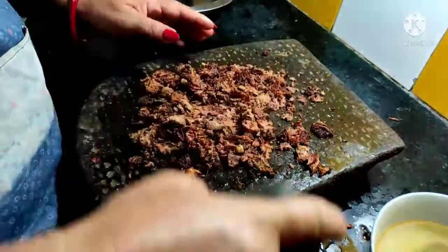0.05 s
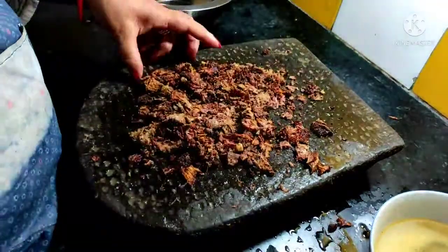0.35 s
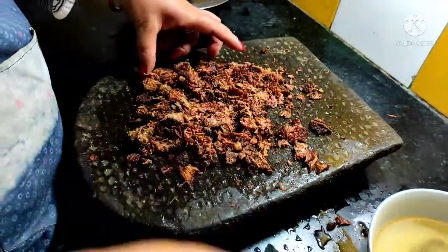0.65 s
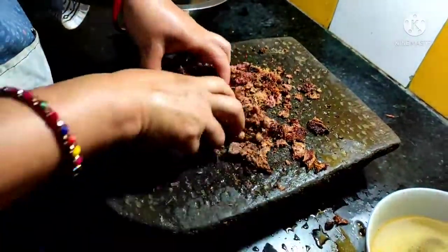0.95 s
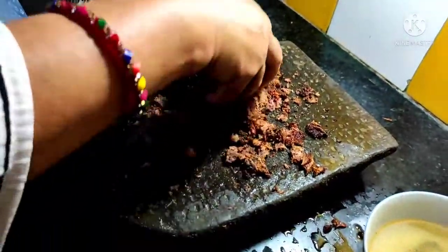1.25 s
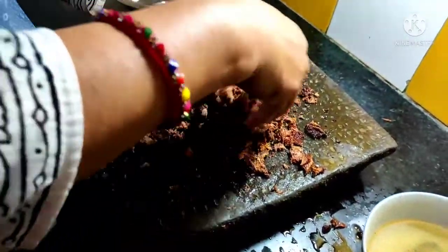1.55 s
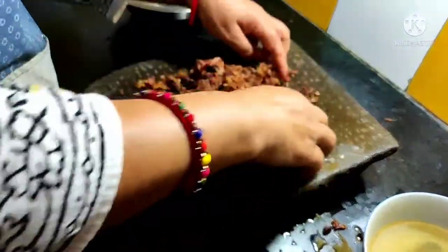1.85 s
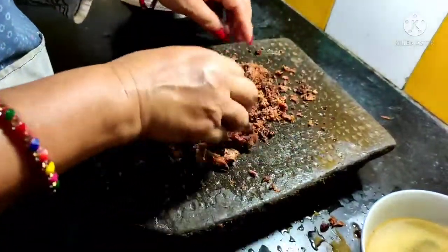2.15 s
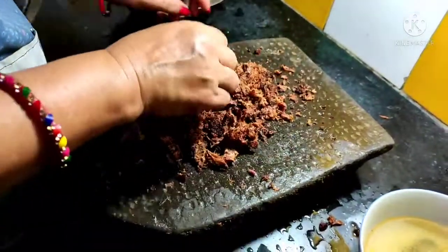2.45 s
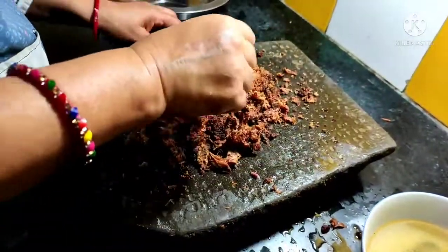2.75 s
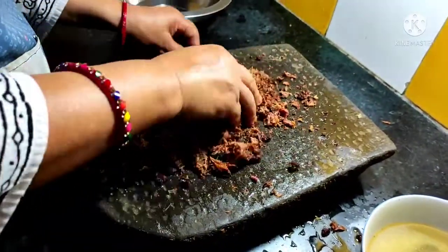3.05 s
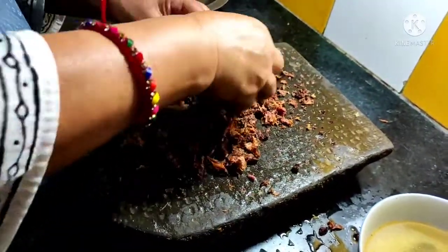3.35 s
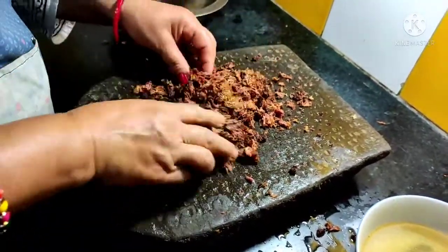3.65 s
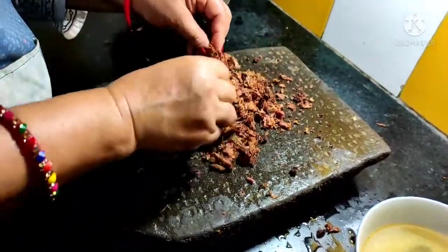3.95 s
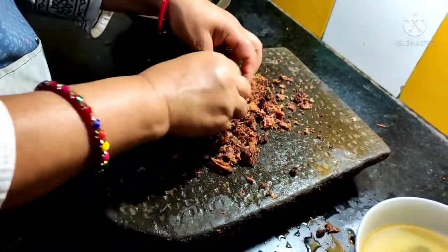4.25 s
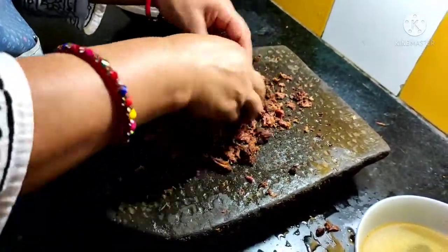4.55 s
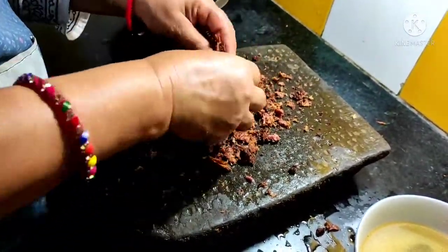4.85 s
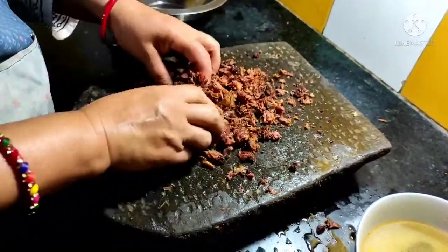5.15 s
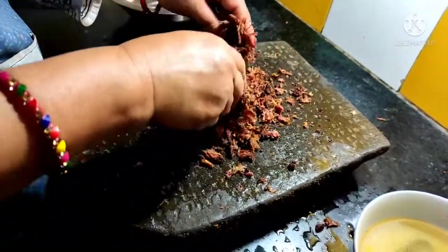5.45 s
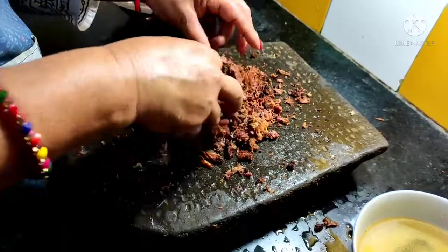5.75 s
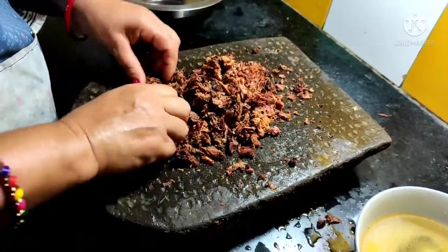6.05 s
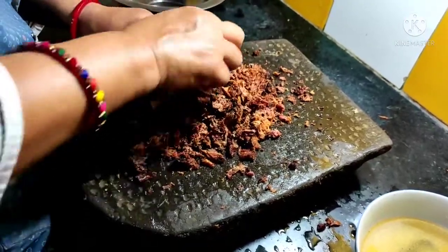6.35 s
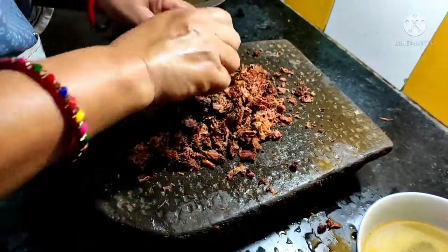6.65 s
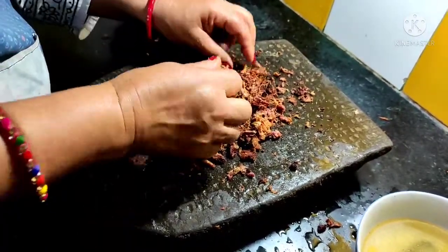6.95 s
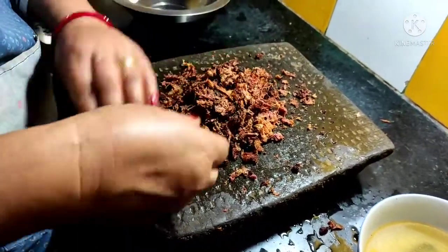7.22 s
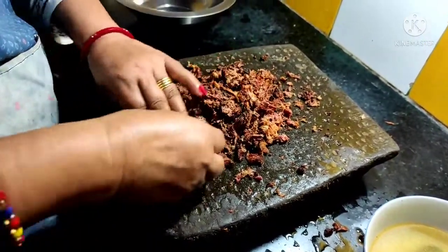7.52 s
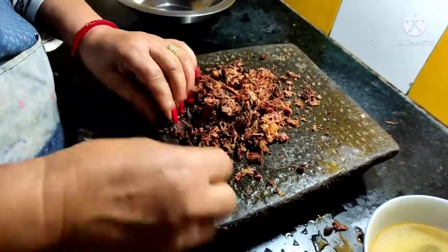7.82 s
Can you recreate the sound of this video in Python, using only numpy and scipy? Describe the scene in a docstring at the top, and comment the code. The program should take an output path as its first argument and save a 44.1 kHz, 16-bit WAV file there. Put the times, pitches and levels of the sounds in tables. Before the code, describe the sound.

In a tiled kitchen an appliance motor hums low and steady. A stone pounder is set down on a stone slab with a dull knock and then a loud, ringing clack, the counter booming underneath. Hands then gather dried shredded meat with quiet, crisp rustles and occasional tiny snaps. The stone grates briefly, and near the end a sleeve catches and swishes past. Everything sounds close, with a short room echo.

```python
"""A tiled kitchen: an appliance motor hums over room rumble; a lower tone beats against it for about 2 s.
A stone pounder is set down on a stone slab: a dull knock at 0.45 s, then a hard, ringing clack at 0.66 s;
the counter booms under it. From 0.9 s hands gather dried, shredded meat, which rustles and snaps.
At 4.7 s the pounder grates over the slab; at 6.3 s a sleeve catches and swishes past."""
import sys
import numpy as np
from scipy import signal
from scipy.fft import rfft, irfft, next_fast_len
from scipy.io import wavfile
from scipy.ndimage import uniform_filter1d

SR = 44100
rng = np.random.default_rng(int(sys.argv[2]) if len(sys.argv) > 2 else 0)


def materialize(psi):
    """Save the field psi as 16-bit PCM at rate SR to the path in sys.argv[1].

    A 1-D psi becomes a single channel; in a 2-D psi each row is a channel.
    """
    bounded = np.clip(np.atleast_2d(psi).T, -1, 1)
    quanta = np.round(bounded * 32767).astype(np.int16)
    wavfile.write(sys.argv[1], SR, quanta)


N = 347508
TIME = np.arange(N) / SR
# spectrum of a breaking fibre: (frequency [Hz], level [dB])
FIBRE_SPECTRUM = [(1000, -20.5), (2200, -12), (3600, -18), (6000, 0.5), (8400, 11.5), (10000, -9.5),
                  (12000, -9), (15000, -11)]


def undb(db):
    """Decibels to gain."""
    return 10 ** (np.asarray(db) / 20)


def unit(x):
    """Scale to rms 1."""
    return x / np.sqrt(np.mean(x ** 2))


def pan(db):
    """Stereo gains for a left-minus-right level."""
    return undb(np.array([[db], [-db]]) / 2)


def fade(t, t60_s):
    """Exponential decay."""
    return np.exp(-np.log(1000) * t / t60_s)


def swell(start_s, rise_s, t60_s):
    """Linear rise, exponential release."""
    t = TIME - start_s
    return np.clip(t / rise_s, 0, 1) * fade(np.maximum(t - rise_s, 0), t60_s)


def walk(rate_hz):
    """Smooth random drift, rms 1."""
    hold = int(SR / rate_hz)
    steps = np.repeat(rng.standard_normal(N // hold + 1), hold)[:N]
    return unit(uniform_filter1d(uniform_filter1d(steps, hold), hold))


def grains(rate_hz, spread_db):
    """Stereo stream of random clicks of uneven size, rms 1."""
    sizes = undb(spread_db * np.minimum(rng.exponential(size=(2, N)), 5))
    hits = rng.random((2, N)) < rate_hz / SR
    return unit(hits * sizes * rng.standard_normal((2, N)))


def cut(x, hz, order, kind="low"):
    """Low- or high-pass."""
    return signal.sosfilt(signal.butter(order, hz, kind, fs=SR, output="sos"), x)


def colour(x, spectrum):
    """Minimum-phase filter from (Hz, dB) points; attacks stay sharp."""
    size = next_fast_len(x.shape[-1] + 4096, real=True) * 2
    hz, db = np.transpose(spectrum)
    bins_hz = np.maximum(np.fft.rfftfreq(size, 1 / SR), 1)
    gain = undb(np.interp(np.log(bins_hz), np.log(hz), db))
    cepstrum = irfft(np.log(gain))
    cepstrum[1:size // 2] *= 2
    cepstrum[size // 2 + 1:] = 0
    return irfft(rfft(x, size) * np.exp(rfft(cepstrum)))[..., :x.shape[-1]]


def ring(modes, t):
    """Damped sines started by one blow."""
    return sum(undb(db) * fade(t, t60_s) * np.sin(2 * np.pi * hz * t) for hz, db, t60_s in modes)


def excite(modes, clicks):
    """Modes rung by a click stream."""
    return signal.fftconvolve(clicks, ring(modes, TIME[:SR // 10])[None], axes=1)[:, :N]


def add(out, start_s, sound):
    """Mix a sound in at a time."""
    i = int(start_s * SR)
    out[:, i:i + sound.shape[-1]] += sound[..., :N - i]


def kitchen(x, wet_db, build_s, shared_hz=550):
    """Direct sound plus a diffuse room tail, alike at both ears in the bass; the very top is cut short."""
    # tail decay; the room up to 8 kHz, cut short above: (frequency [Hz], t60 [s])
    decay = [(100, 0.93), (450, 0.48), (900, 0.38), (2000, 0.38), (3000, .31), (4000, 0.33), (8000, 0.34),
             (11000, 0.17), (15000, 0.073)]
    t = TIME[:SR // 2]
    bins_hz = np.maximum(np.fft.rfftfreq(len(t), 1 / SR), 1)
    noise = np.exp(2j * np.pi * rng.random((3, len(bins_hz))))
    shared = 1 / (1 + (bins_hz / shared_hz) ** 2) ** 2
    noise = np.sqrt(shared) * noise[0] + np.sqrt(1 - shared) * noise[1:]
    hz, t60s = np.transpose(decay)
    bands = [np.interp(np.log(bins_hz), np.log(hz), row) for row in np.eye(len(hz))]
    tail = sum(irfft(noise * band, len(t)) * fade(t, t60_s) for band, t60_s in zip(bands, t60s))
    tail *= 1 - np.exp(-(t / build_s) ** 2)
    tail = unit(tail) / np.sqrt(len(t))
    return x + undb(wet_db) * signal.fftconvolve(x, tail, axes=1)[:, :N]


def motor(hum_hz=206.6, flutter_db=0.79, overtone_db=3, right_lag_s=0.00041, octave_db=-26):
    """Nearly pure hum with faint, unsteady overtones; a lower tone beats against it and dies away."""
    # hum envelope: (time [s], level [dB])
    levels = [(0, -42.5), (.8, -43.5), (2.3, -40.5), (6.8, -41), (7.88, -42)]
    # lower tone: (start [s], rise [s], t60 [s], offset below hum [Hz], level re hum [dB])
    beats = [(0, 1.16, .35, 9.3, -1), (1.394, .12, 1.9, 5.2, -1)]
    # hum harmonics: (multiple, relative level [dB])
    overtones = [(2, -37.5), (3, -38.5), (4, -35), (5, -39), (6, -38.5)]
    ear_time = TIME - np.array([[0], [right_lag_s]])
    phase = 2 * np.pi * hum_hz * ear_time + 0.03 * walk(11)
    tone = np.sin(phase) * undb(flutter_db * walk(40))
    for start_s, rise_s, t60_s, below_hz, db in beats:
        lower_phase = phase - 2 * np.pi * below_hz * (TIME - start_s)
        octave = undb(octave_db) * np.sin(2 * lower_phase + walk(65))
        tone += undb(db) * swell(start_s, rise_s, t60_s) * (np.sin(lower_phase) + octave)
    out = tone * pan(8.92)
    for multiple, db in overtones:
        overtone = [undb(2.5 * walk(35)) * np.sin(multiple * ear + 0.9 * walk(25)) for ear in phase]
        out += undb(db + overtone_db) * np.array(overtone)
    level_db = np.interp(TIME, *np.transpose(levels))
    return np.sqrt(2) * out * undb(level_db)


def air(level_db=-60, crossover_hz=550, drift_db=0.8):
    """Room rumble: alike at both ears in the bass, unrelated in the treble."""
    # room noise: (frequency [Hz], level [dB])
    spectrum = [(25, -6.5), (50, 1.5), (90, -2.5), (130, -13), (160, 7.5), (200, -10), (260, -4.5),
                (480, -14.5), (750, -13.5), (1400, -21), (4000, -29), (5800, -32), (8000, -22.5),
                (11000, -45.5), (15000, -58.5)]
    shared = cut(rng.standard_normal(N), crossover_hz, order=2)
    apart = cut(rng.standard_normal((2, N)), crossover_hz, order=1, kind="high")
    rumble = unit(colour(shared * pan(5) + apart * pan(1.8), spectrum))
    return rumble * undb(level_db + drift_db * walk(3))


def counter(boom_hz=88, rise_s=0.012, thud_db=-3, gain_db=1.5):
    """The counter top booms briefly under stone and hands."""
    # dull bumps: (time [s], level [dB], t60 [s])
    bumps = [(.002, -37.5, 0.32), (0.293, -41.5, 0.32), (0.343, -40, 0.24), (0.474, -23, 0.083),
             (.672, -32.5, 0.22), (3.656, -46, 0.25), (6.288, -41, 0.12)]
    # (frequency [Hz], level [dB])
    thud_spectrum = [(25, -30.5), (50, -13.5), (80, -1), (125, -14.5), (158, -2),
                     (220, -20), (330, -12.5), (420, -25), (600, -27.5), (3000, -70.5)]
    out, t = np.zeros((2, N)), TIME[:SR // 2]
    for start_s, db, t60_s in bumps:
        thud = unit(colour(rng.standard_normal(len(t)), thud_spectrum))
        boom = np.sin(2 * np.pi * boom_hz * t) + undb(thud_db) * thud
        envelope = fade(t, t60_s) * (1 - np.exp(-t / rise_s))
        add(out, start_s, undb(db + gain_db) * boom * envelope)
    return out * pan(4.3)


def hands(grip, settle_t60_s=0.52, touch_s=0.85, crumb_db=-11, splinter_db=-66.5, firm_push_db=-51):
    """Pushed shreds crackle, skin and cloth rub; firm pushes splinter the driest fibres."""
    # pushes on the meat: (start [s], rise [s], rustle level [dB], rub level [dB])
    pushes = [(0, 0.0024, -60, -64.5), (.12, 0.077, -71, -72), (.88, 0.13, -53, -61), (1.0, 0.12, -54, -58),
              (1.14, 0.064, -57.5, -69), (1.49, 0.064, -66.5, -80.5), (1.64, 0.09, -57.5, -64),
              (1.84, 0.069, -61, -66), (1.92, 0.11, -57.5, -71), (2.05, 0.011, -69.5, -66),
              (2.3, 0.068, -60, -65.5), (2.45, 0.022, -65, -69.5), (2.7, 0.04, -60.5, -77.5),
              (2.78, 0.16, -58.5, -61.5), (3.06, 0.044, -63.5, -76), (3.17, 0.032, -54.5, -61.5),
              (3.28, 0.066, -61.5, -69.5), (3.48, 0.11, -67, -69), (3.61, 0.086, -56.5, -67),
              (3.73, .12, -56, -65), (3.83, 0.047, -56, -61), (4.0, 0.18, -58.5, -64),
              (4.21, 0.15, -53.5, -60.5), (4.5, 0.026, -60.5, -64), (4.71, 0.035, -61, -64),
              (4.86, 0.037, -73, -69), (5.1, 0.073, -59, -66), (5.19, 0.0847, -55.5, -63),
              (5.41, 0.064, -68, -77), (5.57, 0.046, -63.5, -87.5), (6.06, 0.04, -62, -69),
              (6.14, 0.107, -62.5, -86.5), (6.7, 0.16, -71.5, -77), (6.92, 0.083, -62, -70),
              (7.131, .08, -64.5, -70.5), (7.359, 0.19, -56.5, -70), (7.54, 0.035, -71, -65),
              (7.7, 0.039, -65, -69.5)]
    # shred on shred: (frequency [Hz], level [dB])
    rustle_spectrum = [(2500, -21.5), (4500, -13), (6000, -8.5), (7200, 0.5), (8600, 0), (9600, -10),
                       (11000, -30.5), (15000, -38)]
    # skin and cloth: (frequency [Hz], level [dB])
    rub_spectrum = [(300, -4.5), (700, -2), (1300, -3.5), (2100, 1), (3300, -3.5), (5000, -7), (7000, -13),
                    (12000, -39)]
    # splintering fibres: (frequency [Hz], level [dB])
    splinter_spectrum = [(3000, -20), (6500, -7.5), (9000, -5), (10500, 1.5), (13000, 0.5), (15000, -5)]
    rustle = unit(colour(grains(rate_hz=4400, spread_db=-2.5), rustle_spectrum))
    crumbs = unit(colour(grains(rate_hz=52, spread_db=-1.5), FIBRE_SPECTRUM))
    rub = unit(colour(grains(rate_hz=8600, spread_db=1.5), rub_spectrum))
    splinters = unit(colour(grains(rate_hz=1400, spread_db=3), splinter_spectrum))
    touching = TIME > touch_s  # fingers rest in the meat between pushes
    rustle_power = touching * undb(-73.5) ** 2
    rub_power = touching * undb(-76.5) ** 2
    for start_s, rise_s, rustle_db, rub_db in pushes:
        push = swell(start_s, rise_s, settle_t60_s)
        rustle_power += (undb(rustle_db) * push) ** 2
        rub_power += (undb(rub_db) * push) ** 2
    rustle_gain = np.sqrt(rustle_power)
    out = (rustle + crumbs * undb(crumb_db)) * rustle_gain
    out += splinters * undb(splinter_db) * (rustle_gain / undb(firm_push_db)) ** 1.25
    out += rub * np.sqrt(rub_power)
    return out * undb(grip)


def snaps(gain_db=3, t60_s=0.02, ring_db=-1, ring_q=4):
    """Single dry fibres break with a bright tick, each ringing at its own pitch."""
    # fibre breaks: (time [s], level [dB], left minus right [dB], ring [Hz])
    breaks = [(0.452, -50, 1, 7200), (0.895, -49, 1, 7950), (2.073, -46, 9, 6837), (2.7428, -50, 3.5, 8000),
              (3.644, -46, -1.5, 7400), (3.6678, -44, 4, 7870), (3.7005, -49, 2, 8000),
              (4.318, -31, 11, 8400), (4.323, -33, -1.5, 6630), (4.329, -37, -6, 7400),
              (4.3364, -38, -7, 5950), (4.546, -46.5, -8.5, 6540), (4.573, -48.5, 5, 6600),
              (6.0991, -45.5, 7, 7500), (6.243, -49, 14, 8310), (6.752, -54, -6.5, 7950),
              (7.3936, -38, 0, 7000)]
    out, t = np.zeros((2, N)), TIME[:SR // 20]
    for start_s, db, side_db, hz in breaks:
        burst = rng.standard_normal((2, len(t))) * fade(t, t60_s)
        resonance = signal.iirpeak(hz, ring_q, fs=SR)
        fibre = signal.lfilter(*resonance, signal.lfilter(*resonance, burst))
        tick = unit(colour(burst, FIBRE_SPECTRUM)) + undb(ring_db) * unit(fibre)
        add(out, start_s, undb(db + gain_db) * pan(side_db) * tick / np.abs(tick).max())
    return kitchen(out, wet_db=-7, build_s=0.0025)


def pounder(body_db=-15, crack_t60_s=0.042, antiphase_hz=1600, radiate_hz=470):
    """Each contact rings the stones with a gritty crack, at its own level and brightness."""
    # stone on slab: (time [s], level [dB], low-pass [Hz], relative crack level [dB])
    knocks = [(0.4525, -38, 3600, -5), (0.4549, -7, 1020, -10.5), (0.6565, -1.5, 5770, -4),
              (0.6593, 1, 1590, -6.5), (0.6693, -11.5, 2980, -7.5), (3.647, -40.5, 1000, -6),
              (4.546, -39.5, 900, -2), (4.590, -49, 1360, -1), (5.171, -46.5, 3505, -6.5),
              (5.580, -43.5, 1288, -12.5), (5.922, -43, 1350, -1), (7.348, -44.5, 1310, 0),
              (7.393, -48, 3000, -1)]
    # slab and pounder together: (frequency [Hz], level [dB], t60 [s])
    modes = [(279, -4, 0.081), (479, -11, 0.17), (569, -2, 0.084), (663, -4, 0.045), (743, -1.5, 0.049),
             (940, -10.5, .04), (1130, -1.5, 0.042), (1362, -4, 0.017), (1516, -7.5, 0.049),
             (1800, -5.5, .035), (1897, -5.5, 0.065), (2110, -4, 0.06), (2355, -10, .03),
             (2570, -9.5, 0.022), (2830, -3, 0.05), (2948, -8, 0.035)]
    # gritty crack: (frequency [Hz], level [dB])
    crack_spectrum = [(150, -14), (300, -15.5), (420, -21), (560, -1), (950, 9), (1700, 4.5), (2600, 3.5),
                      (3200, -3.5), (3800, -11.5), (5000, -11), (6200, -14.5), (8000, -1), (9600, -6),
                      (11000, -13), (15000, -11)]
    out, t = np.zeros((2, N)), TIME[:SR // 2]
    left = ring(modes, t)
    # midrange: the two sides of the slab swing against each other
    right = left - 2 * signal.lfilter(*signal.iirpeak(antiphase_hz, Q=2, fs=SR), left)
    body = undb(body_db) * np.array([left, right]) * pan(0.71)
    for start_s, db, cutoff_hz, crack_db in knocks:
        burst = rng.standard_normal((2, len(t))) * fade(t, crack_t60_s)
        crack = undb(crack_db) * colour(burst, crack_spectrum)
        add(out, start_s, undb(db) * cut(body + crack, cutoff_hz, order=4))
    # a small slab radiates little bass, and almost nothing between its two lowest modes
    out = cut(out, radiate_hz, order=3, kind="high")
    out = signal.lfilter(*signal.iirnotch(410, Q=3, fs=SR), out)
    return kitchen(out, wet_db=-12.5, build_s=0.016, shared_hz=627.7)


def ting(gain_db=-3.5, rise_s=0.00099, roughness=0.62):
    """Thin ring, roughened as the pounder chatters to rest."""
    # high stone modes: (frequency [Hz], level [dB], t60 [s])
    modes = [(7250, -26.5, 0.071), (7220, -43, 0.18), (8650, -48.5, 0.18), (9600, -54, 0.1),
             (10400, -55, 0.12)]
    # contacts: (time [s], level [dB])
    contacts = [(0.6576, -3), (0.664, 1)]
    out, t = np.zeros((2, N)), TIME[:SR // 2]
    tone = pan(2) * ring(modes, t) * (1 - np.exp(-t / rise_s))
    for start_s, db in contacts:
        chatter = 1 + roughness * np.array([walk(450), walk(450)])[:, :len(t)]
        add(out, start_s, undb(db + gain_db) * tone * chatter)
    return kitchen(out, wet_db=-15, build_s=0.01)


def drag(grip, grip_db=2.5):
    """The pounder grates over the slab; tiny clicks ring the stone."""
    # slides: (start [s], rise [s], level [dB], t60 [s])
    slides = [(4.685, 0.025, -56.5, 0.19), (4.721, 0.032, -57.5, 0.079), (4.799, 0.055, -60.5, 0.28)]
    # stone grating on stone: (frequency [Hz], level [dB], t60 [s])
    modes = [(810, -4, 0.017), (900, -2.5, 0.016), (1000, -6, .016), (1280, -12, .02), (1580, -10.5, 0.028),
             (2030, -19, .025), (2870, -10, .012), (3362, -11, .012), (4040, -19, .012)]
    grating = unit(excite(modes, grains(rate_hz=3000, spread_db=1)))
    envelope = sum(undb(db) * swell(start_s, rise_s, t60_s) for start_s, rise_s, db, t60_s in slides)
    return grating * envelope * undb(grip_db * grip)


def sleeve(catch_s=6.291, catch_db=-44.5, cutoff_hz=9000):
    """Cloth catches on the slab with a ringing rasp, then slides on as a rough hiss."""
    # resonances of the catch: (frequency [Hz], level [dB], t60 [s])
    modes = [(2600, -12, 0.0072), (4080, -14, .015), (5280, -7, .015), (5586, 5, 0.013), (6080, -2, .012),
             (6600, 4, 0.014), (7170, 6, 0.0133), (7800, -8, .012), (8700, 1, .011)]
    # slides: (start [s], rise [s], t60 [s], level [dB])
    slides = [(6.286, 0.013, 0.414, -49.5), (6.32, 0.084, 1.4, -51.5)]
    # sliding threads: (frequency [Hz], level [dB])
    hiss_spectrum = [(300, 0), (520, -11), (800, -2.5), (1300, -9.5), (1800, -8), (2650, -2.5),
                     (3300, -12.5), (4050, -5), (4700, -6), (5400, -1), (6300, -6), (7100, -1.5),
                     (9300, -6), (10600, -28)]
    rasp = excite(modes, grains(rate_hz=4000, spread_db=-0.5))
    rasp = unit(cut(rasp, cutoff_hz, order=8))
    rasp *= undb(catch_db) * swell(catch_s, rise_s=0.02, t60_s=0.27)
    hiss = unit(colour(grains(rate_hz=4000, spread_db=2), hiss_spectrum))
    hiss *= sum(undb(db) * swell(start_s, rise_s, t60_s) for start_s, rise_s, t60_s, db in slides)
    return (rasp + hiss) * undb(walk(90))


def scene():
    """Background, impacts and friction around the slab."""
    impacts = pounder() + ting() + counter() + snaps()
    grip = walk(90)  # the contact grips and lets go many times a second
    friction = kitchen(hands(grip) + drag(grip) + sleeve(), wet_db=-6, build_s=0.0044)
    return motor() + air() + impacts + friction


def record(dry, ceiling=0.9, top_hz=15450):
    """Soft peak limit, then a steep low-pass."""
    limited = ceiling * np.tanh(dry / ceiling)
    return signal.sosfilt(signal.ellip(8, 0.2, 70, top_hz, fs=SR, output="sos"), limited)


dry = scene()
out = record(dry)
materialize(out)
```